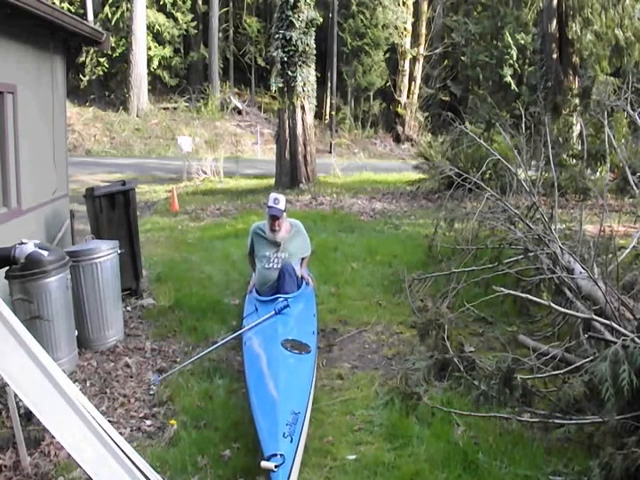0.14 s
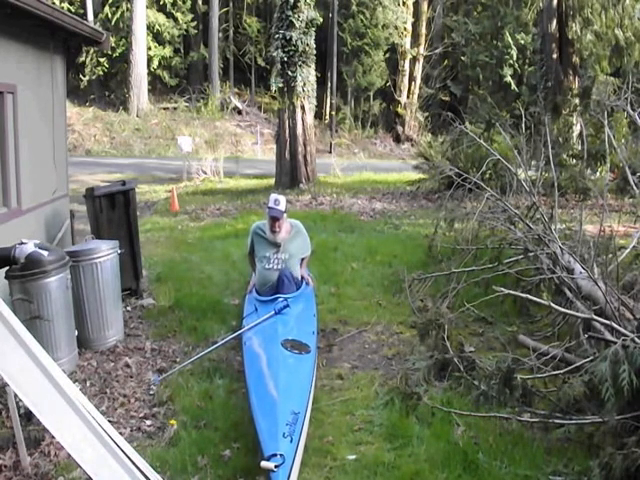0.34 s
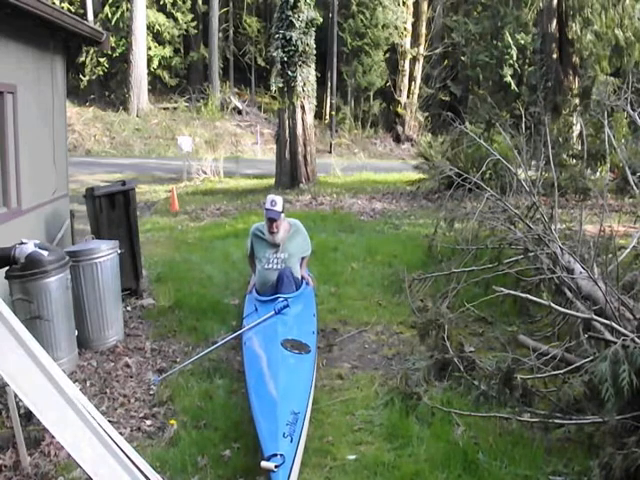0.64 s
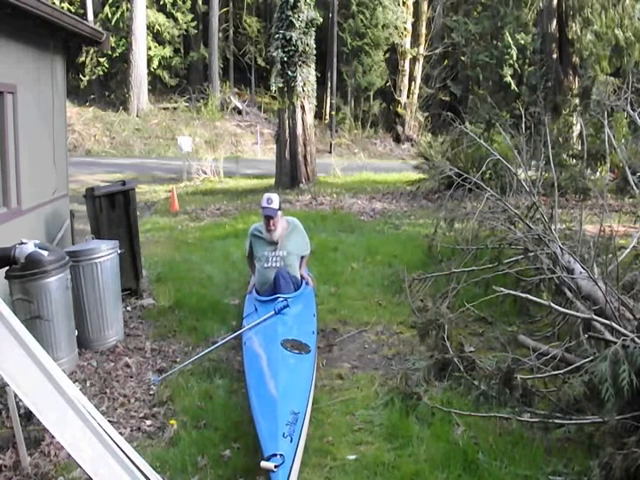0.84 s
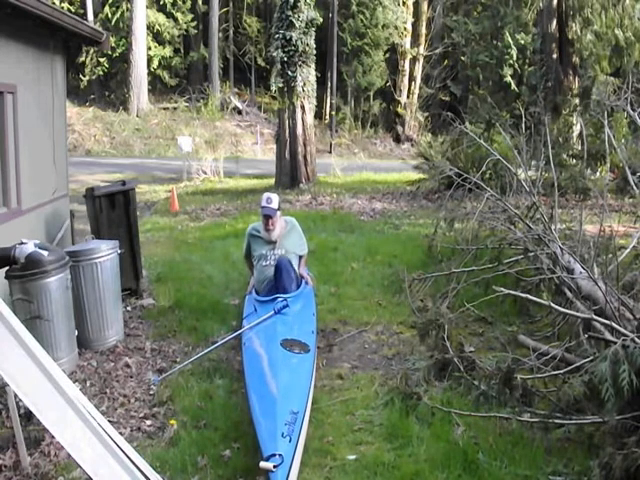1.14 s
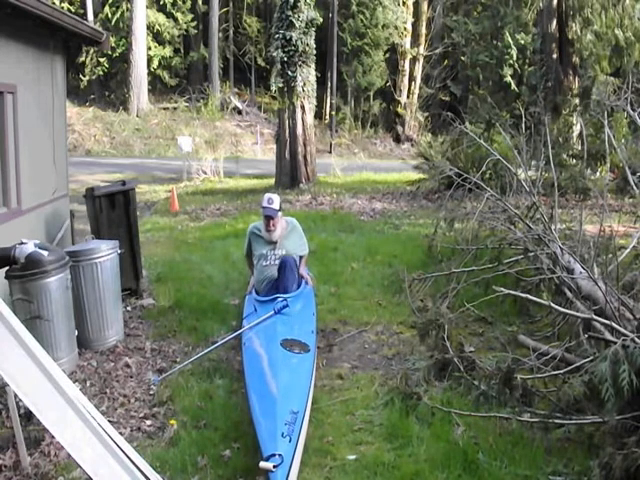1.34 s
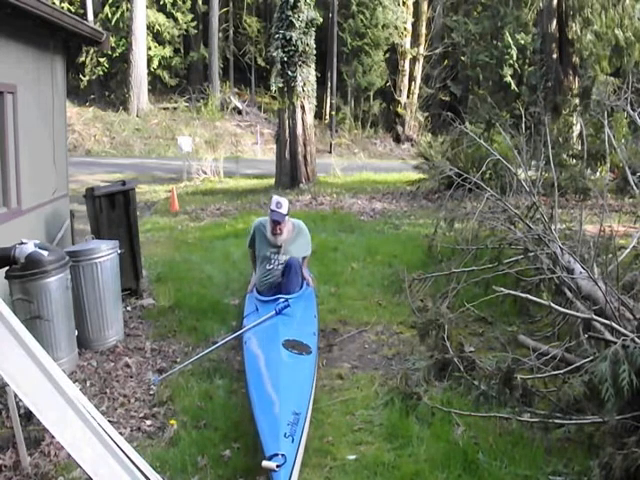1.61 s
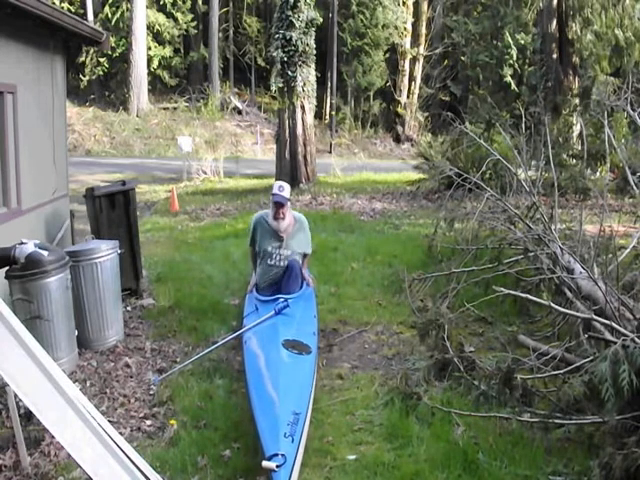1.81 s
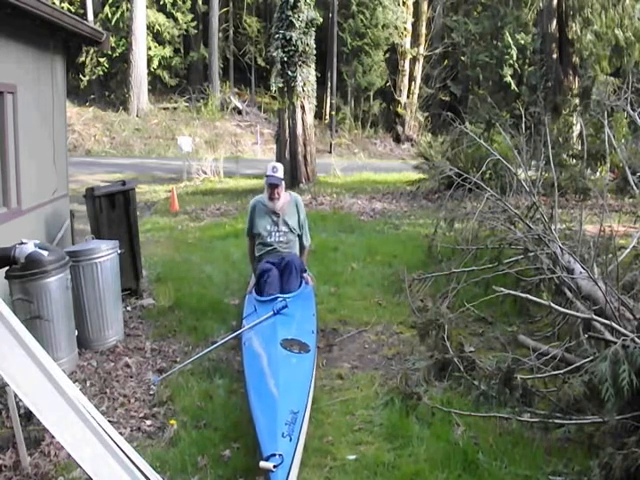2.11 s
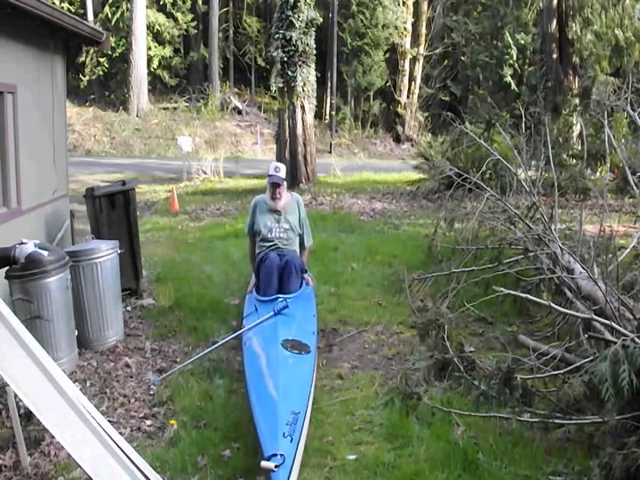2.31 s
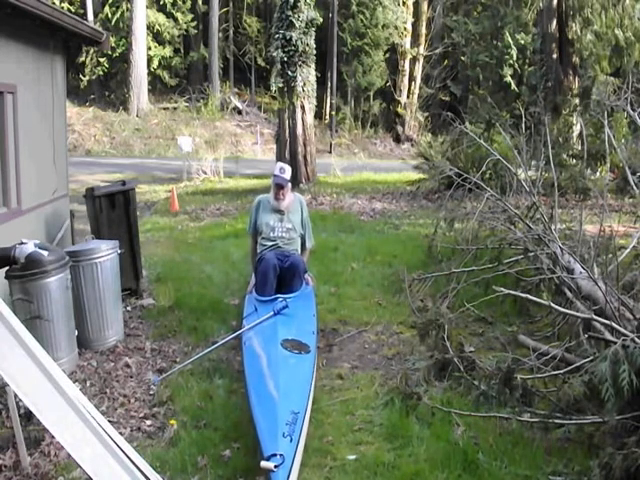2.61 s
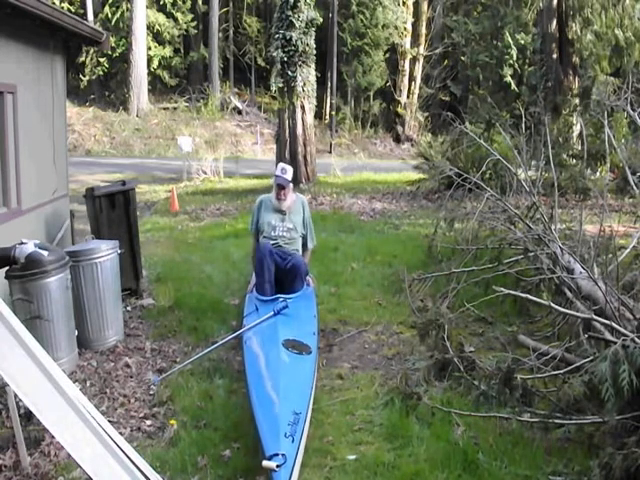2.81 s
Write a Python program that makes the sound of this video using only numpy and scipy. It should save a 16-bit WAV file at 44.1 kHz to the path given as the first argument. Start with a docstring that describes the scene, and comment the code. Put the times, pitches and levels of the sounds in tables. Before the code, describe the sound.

Someone moves inside a kayak lying on a lawn. Short squeaks and dull booms, sparse bumps and scuffs, more squeaks, then dense hollow knocking with a sharp deck clack; quiet yard, nearly centred pickup, slight scattered echo.

```python
"""Someone shifts their weight in a kayak lying on a lawn and starts to climb out, in quiet outdoor air.
Clothes rub along the shell throughout. First the cockpit rim squeaks, as gliding stick-slip tones.
Heels and knees then thump the hollow hull, made of decaying tones and noise; it booms and sways on the grass.
The rim squeaks again, the thumps crowd together, and something hard clacks on the deck, with one rebound.
A tiny dry tick comes near the end. The yard answers faintly all along, with scattered, fading noise echoes."""
import sys
import numpy as np
from scipy import signal
from scipy.fft import rfft, irfft
from scipy.io import wavfile
from scipy.ndimage import uniform_filter1d

SR = 44100
rng = np.random.default_rng(int(sys.argv[2]) if len(sys.argv) > 2 else 0)


def file_out(sig):
    """Save sig as 16-bit WAV at sys.argv[1]."""
    # one column per channel
    cols = np.atleast_2d(sig).T
    # limit, then scale
    lim = np.clip(cols, -1, 1)
    pcm = np.round(lim * 32767).astype(np.int16)
    wavfile.write(sys.argv[1], SR, pcm)


N = 130095
TIME = np.arange(N) / SR  # seconds

# colour of the outdoor background: (frequency [Hz], relative level per Hz [dB])
AIR_COLOUR = [(25, 13.5), (60, 4.5), (140, 3), (280, -15.5), (600, -21.5), (3000, -18), (5000, -30),
              (11500, -38.5), (16000, -39)]
# strength of the scattered echoes: (frequency [Hz], level [dB])
ECHO_LEVELS = [(100, -29.5), (2500, -13), (14000, -29)]
# how long the echoes take to fall by 60 dB: (frequency [Hz], decay time [s])
ECHO_DECAYS = [(100, 0.73), (1500, 0.41), (10000, 0.57)]
# loudness of clothes and shoes rubbing on the shell: (time [s], level [dB])
RUBBING_LEVELS = [(0, -50), (.35, -49.5), (.52, -58.5), (.82, -52), (.95, -45), (1.05, -33.5), (1.11, -43),
                  (1.245, -43.5), (1.33, -49), (1.55, -38.5), (1.70, -39), (1.77, -30), (1.90, -33.5),
                  (2.07, -40.5), (2.17, -36), (2.23, -43.5), (2.40, -37.5), (2.465, -30), (2.57, -32.5),
                  (2.68, -43), (2.95, -51)]
# colour of the rubbing: (frequency [Hz], relative level per Hz [dB])
RUBBING_COLOUR = [(100, -12), (250, -0.5), (750, 2), (1400, -3.5), (3000, -4.5), (4300, -14), (7000, -31.5),
                  (10000, -32.5), (12000, -64)]
# stick-slip squeaks on the rim: (time of loudest point [s], release [s], pitch [Hz],
# glide [octaves per s], level [dB], pitch jitter [share of pitch], overtone level [dB])
RIM_SQUEAKS = [(0.128, .011, 5750, 0, -40, .04, -25), (0.183, .018, 3520, .3, -34.5, .02, -27),
               (0.181, .014, 2800, 0, -37, .12, -17), (0.196, .008, 2140, .5, -33, .015, -24),
               (0.235, .007, 2075, 1.2, -22, .008, -20), (0.251, .008, 2108, .8, -12.5, .004, -38),
               (0.254, .012, 2750, -4, -32, .11, -6), (0.275, .007, 2110, -.5, -30.5, .008, -32),
               (1.072, .012, 2150, -4, -26.5, .18, -15), (1.145, .010, 1900, -12, -32, .15, -9),
               (1.163, .014, 1500, -7, -30, .28, -6), (1.276, .018, 1135, 0, -42, .03, 1),
               (1.349, .005, 1580, 12, -35, .035, -4), (1.361, .006, 1830, 11, -25, .035, -10),
               (1.369, .007, 1940, 7, -19.5, .022, -20), (1.375, .005, 2820, 24, -26, .04, -20),
               (1.385, .007, 3150, -8, -28, .11, -19), (1.393, .009, 2060, 2, -34, .08, -5)]
# hard clack on the deck and its rebound: (time [s], level [dB])
DECK_CLACKS = [(2.3468, -8), (2.3505, -18)]
# ringing tones of the stiff deck panels: (frequency [Hz], relative level [dB])
DECK_TONES = [(743, -12), (931, -11), (1130, -13), (1486, -12), (1642, -14), (1954, -11), (2327, -7),
              (2610, -7), (2773, -8), (2945, -7), (3255, -11)]
# colour of hard contacts: (frequency [Hz], relative level per Hz [dB])
CONTACT_COLOUR = [(150, -38), (700, 6.5), (1400, -1), (2650, 4.5), (3800, -5.5), (9000, -27), (11000, -29),
                  (16000, -62)]
# ringing tones of the hollow hull: (frequency [Hz], relative level [dB], time to fall by 60 dB [s])
HULL_TONES = [(66.5, -6, 0.25), (83.7, -9.5, 0.32), (110.9, -11.5, 0.57), (137, 1, 0.23),
              (158.4, -0.5, 0.14), (176.6, -9.5, 0.35), (238.6, -11, 0.3), (266.6, -12.5, 0.33),
              (295.1, -20.5, 0.52), (474, -29.5, 0.53), (533, -25, 0.37)]
# blows on the hull: (time [s], sway level [dB], boom level [dB], knock level [dB],
# knock pitch [Hz], contact scuff level [dB])
HULL_BLOWS = [(0.2945, -21, -13, -19, 295, -22), (0.304, -6.5, -51, -25.5, 680, -21),
              (0.33, -24, -19, -21, 217, -57), (0.566, -52, -35.5, -29, 620, -46),
              (0.574, -22, -19.5, -23, 204, -39.5), (0.72, -30.5, -47, -47.5, 483, -66),
              (0.975, -24, -33, -34, 100, -43), (1.043, -19.5, -22.5, -34, 130, -35),
              (1.087, -17, -36, -41, 150, -37), (1.418, -29, -21, -21.5, 248, -33),
              (1.49, -45, -29.5, -48, 720, -31.5), (1.594, -21.5, -27.5, -47, 297, -62),
              (1.659, -48, -29, -25, 880, -34), (1.777, -30, -23, -36, 500, -34.5),
              (1.826, -39.5, -24, -17.5, 464, -27), (1.8364, -22, -23, -16, 640, -32),
              (1.858, -31, -18.5, -19.5, 270, -57), (1.893, -33, -19.5, -21.5, 355, -28),
              (1.920, -22, -19, -23, 250, -30.5), (1.944, -15.5, -21, -35, 400, -30),
              (2.019, -14, -26.5, -27, 295, -33.5), (2.084, -35, -30, -30, 380, -64),
              (2.161, -17.5, -27.5, -29.5, 750, -35), (2.2723, -47, -57, -35, 670, -36.5),
              (2.282, -41, -25, -14.5, 275, -58), (2.2947, -23, -21.5, -10, 298, -31.5),
              (2.320, -20, -17.5, -16, 256, -35), (2.4958, -29, -18.5, -27, 151, -34),
              (2.509, -50, -17, -13.5, 120, -28.5), (2.554, -10, -19.5, -16, 195, -60),
              (2.575, -30, -17, -23.5, 625, -61), (2.610, -23, -22, -66, 200, -68)]

# Every "T60" is the time to fall by 60 dB.
AIR_DB = -39
TICK_AT_S, TICK_LENGTH_S, TICK_HEIGHT = 2.6241, 0.00016, 0.29
ECHO_BUILD_T60_S = 0.043  # the gap to full echo strength closes at this rate
SQUEAK_ECHO_DB = -3  # squeaks feed the echoes a little less
SLIPS_PER_S, SLIP_SPREAD_DB, SLIP_S = 260, 1.2, 0.005
GRAIN_SHARE = 0.52  # part of the rubbing made of separate slips, the rest is steady
RUB_BOOM_DB, RUB_RING_DB = -1.5, -13.5  # hull drone and deck ring under the rubbing
OVERTONE_FALL_DB = 10  # drop from each overtone to the next
JITTER_HZ, SQUEAK_TOP_HZ = 542, 4720
SQUEAK_RISE_SHARE = 0.7  # the rise is this much of the release
FLUTTER_HZ, FLUTTER_DB, OVERTONE_FLUTTER_DB = 130, 1.2, 3.8
SQUEAK_RING_DB, SQUEAK_RING_T60_S = -9, 0.06
DECK_DB, DECK_T60_S = -3.5, 0.11
CRACK_DB, CRACK_T60_S = 5, 0.08
SWAY_HZ, SWAY_T60_S = 32.35, 0.32
SOFT_CONTACT_HZ, CONTACT_S = 910, 0.0031  # a soft blow dulls the boom and builds up this long
THUD_DB, THUD_TOP_HZ = -9, 1140  # broad, dull part of every knock
KNOCK_T60_S, KNOCK_WIDTH, SCUFF_T60_S = 0.1, 0.65, 0.12
TONE_SPREAD_DB = 1.5  # how much each ringing tone varies from blow to blow
PORT_LAG_S = 1 / SR  # the left microphone port is a little farther away
CUTOFF_HZ = 16900


def from_db(db):
    """Turn decibels into a plain multiplier."""
    return 10 ** (np.asarray(db) / 20)


def rms_one(x):
    """Scale a sound to an average (rms) strength of 1."""
    return x / np.sqrt(np.mean(x ** 2) + 1e-20)


def at_hz(points, hz):
    """Read a table between its points, with frequency spaced by ratio as in hearing."""
    table_hz, values = np.transpose(points)
    return np.interp(np.log(hz), np.log(table_hz), values)


def fade(t60, size):
    """Die away smoothly from 1, as a ringing object loses its energy."""
    return from_db(-60 * TIME[:size] / t60)


def lowpass(x, hz, order=2):
    """Dull a sound by taking away what lies above a frequency."""
    dull = signal.butter(order, hz, fs=SR, output="sos")
    return signal.sosfilt(dull, x + 1e-18)


def bandpass(x, low, high):
    """Keep what lies between two frequencies."""
    band = signal.butter(2, [low, high], "band", fs=SR, output="sos")
    return signal.sosfilt(band, x)


def noise(colour, size):
    """Make noise of a given colour, with an average (rms) strength of 1."""
    hz = np.maximum(np.arange(size // 2 + 1) * SR / size, 1)
    gain = from_db(at_hz(colour, hz)) * (hz > 20)
    return rms_one(irfft(rfft(rng.standard_normal(size)) * gain, size))


def even(x, size=600):
    """Hold the short-term strength of a noise near 1."""
    return x / np.sqrt(uniform_filter1d(x * x, size) + 1e-12)


def waver(hz, size):
    """Wander at random, no faster than a given rate, with an rms of 1."""
    return rms_one(lowpass(rng.standard_normal(size), hz))


def add(out, s, x):
    """Mix a sound into out at time s."""
    start = int(s * SR)
    out[start:start + len(x)] += x[:N - start]


def struck(tones, size=30000):
    """Ring as a struck body does: fading tones, each with its own strength for this blow."""
    out = np.zeros(size)
    for hz, db, t60 in tones:
        strength = from_db(db + TONE_SPREAD_DB * rng.standard_normal())
        out += strength * fade(t60, size) * np.sin(2 * np.pi * hz * TIME[:size])
    return out


def deck_tones():
    """The deck panels all die away at the same rate."""
    return [(hz, db, DECK_T60_S) for hz, db in DECK_TONES]


def outdoor_air():
    """Steady coloured noise makes the quiet outdoor background."""
    return from_db(AIR_DB) * noise(AIR_COLOUR, N)


def yard(x):
    """Hull and yard scatter the sound into faint echoes, which fade at a rate set for each band."""
    size = SR
    response = np.zeros(size)
    edges = np.geomspace(60, 16000, 9)
    for low, high in zip(edges, edges[1:]):
        middle = np.sqrt(low * high)
        build_up = 1 - fade(ECHO_BUILD_T60_S, size)
        tail = rng.standard_normal(size) * fade(at_hz(ECHO_DECAYS, middle), size) * build_up
        tail = tail / np.linalg.norm(tail)
        response += from_db(at_hz(ECHO_LEVELS, middle)) * bandpass(tail, low, high)
    return signal.fftconvolve(x, response)[:N]


def tick():
    """A single very short pulse makes a dry tick."""
    return TICK_HEIGHT * ((TIME >= TICK_AT_S) & (TIME < TICK_AT_S + TICK_LENGTH_S))


def rubbing():
    """Many tiny slips rustle on the shell, make the hull drone and the deck ring."""
    level = from_db(np.interp(TIME, *np.transpose(RUBBING_LEVELS)))
    slip_now = rng.random(N) < SLIPS_PER_S / SR
    slip_strength = from_db(SLIP_SPREAD_DB * np.minimum(rng.exponential(1, N), 4))
    slips = slip_now * slip_strength
    # each slip dies away over a few milliseconds
    grains = rms_one(signal.lfilter([1], [1, -np.exp(-1 / (SLIP_S * SR))], slips + 1e-18))
    friction = level * rms_one(1 - GRAIN_SHARE + GRAIN_SHARE * grains)

    hull, deck = struck(HULL_TONES), struck(deck_tones())
    body = from_db(RUB_BOOM_DB) * hull / np.linalg.norm(hull)
    body += from_db(RUB_RING_DB) * deck / np.linalg.norm(deck)
    rustle = friction * noise(RUBBING_COLOUR, N)
    drone = signal.fftconvolve(friction * rng.standard_normal(N), body)[:N]
    return rustle + drone


def squeaks():
    """Stick-slip tones catch, glide and let go; unsteady slips make them rasp, and the shell rings on."""
    out, size = np.zeros(N), SR // 5
    t = TIME[:size] - TIME[size // 2]  # 0 at the loudest point
    for s, release, hz, glide, db, jitter, overtone_db in RIM_SQUEAKS:
        pitch = hz * 2 ** (glide * t) * (1 + jitter * waver(JITTER_HZ, size))
        phase = 2 * np.pi * np.cumsum(pitch) / SR
        tone = from_db(FLUTTER_DB * waver(FLUTTER_HZ, size)) * np.sin(phase)
        for k in range(2, 7):
            if k * hz < CUTOFF_HZ:
                # the table's overtone level lies midway between multiples 2 and 3
                steady_db = overtone_db - OVERTONE_FALL_DB * (k - 2.5)
                flutter_db = OVERTONE_FLUTTER_DB * waver(FLUTTER_HZ, size)
                tone += from_db(steady_db + flutter_db) * np.sin(k * phase)
        width = release * np.where(t < 0, SQUEAK_RISE_SHARE, 1)
        swell = np.exp(-0.5 * (t / width) ** 2)
        add(out, s + t[0], np.sqrt(2) * from_db(db) * tone * swell)
    shell = rng.standard_normal(size) * fade(SQUEAK_RING_T60_S, size)
    ringing = signal.fftconvolve(out, shell / np.linalg.norm(shell))[:N]
    return lowpass(out + from_db(SQUEAK_RING_DB) * ringing, SQUEAK_TOP_HZ)


def clack():
    """A hard contact cracks and rings the deck; each tone starts up or down, depending on the spot."""
    out, size = np.zeros(N), SR // 4
    for s, db in DECK_CLACKS:
        ring = sum(rng.choice([-1, 1]) * struck([tone]) for tone in deck_tones())
        crack = noise(CONTACT_COLOUR, size) * fade(CRACK_T60_S, size)
        add(out, s, from_db(db + DECK_DB) * ring)
        add(out, s, from_db(db + CRACK_DB) * crack)
    return out


def knocks():
    """Each blow sways the boat, booms in the hull, rattles panels near the contact and scuffs the surface."""
    out, size = np.zeros(N), SR // 2
    sway = np.sin(2 * np.pi * SWAY_HZ * TIME[:size]) * fade(SWAY_T60_S, size)
    press = np.minimum(TIME[:size] / CONTACT_S, 1)
    spread = 1 + KNOCK_WIDTH / 2
    for s, sway_db, boom_db, knock_db, hz, scuff_db in HULL_BLOWS:
        boom = lowpass(struck(HULL_TONES, size), SOFT_CONTACT_HZ)
        # the panel tones lie so close together that a band of noise stands in for them
        crowd = bandpass(rng.standard_normal(2 * size), hz / spread, hz * spread)
        panel = even(crowd[size:])  # skip the filter's start-up
        thud = rms_one(lowpass(rng.standard_normal(size), THUD_TOP_HZ, order=3))
        knock = (panel + from_db(THUD_DB) * thud) * fade(KNOCK_T60_S, size)
        blow = from_db(sway_db) * sway + from_db(boom_db) * boom + from_db(knock_db) * knock
        scuff = noise(CONTACT_COLOUR, size) * fade(SCUFF_T60_S, size)
        add(out, s, press * blow)
        add(out, s, from_db(scuff_db) * scuff)
    return out


def scene():
    """The boat lies straight ahead; its sound reaches the two microphone ports almost together."""
    boat = knocks() + clack() + rubbing()
    rim = squeaks()
    echoes = yard(boat + from_db(SQUEAK_ECHO_DB) * rim)
    sound = boat + rim + echoes + tick() + outdoor_air()
    left = np.interp(TIME - PORT_LAG_S, TIME, sound)
    return np.array([left, sound])


def record(dry):
    """The deepest rumble is weakened, peaks beyond full scale clip and the top is cut."""
    rumble_cut = signal.butter(1, 12, "high", fs=SR, output="sos")
    top_cut = signal.cheby2(16, 70, CUTOFF_HZ, fs=SR, output="sos")
    clipped = np.clip(signal.sosfilt(rumble_cut, dry), -1, 1)
    return signal.sosfilt(top_cut, clipped)


dry = scene()
out = record(dry)
file_out(out)
```